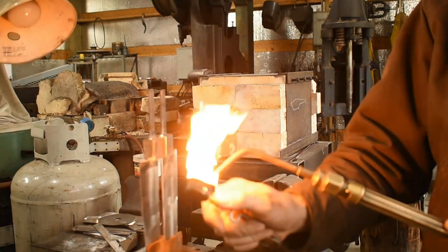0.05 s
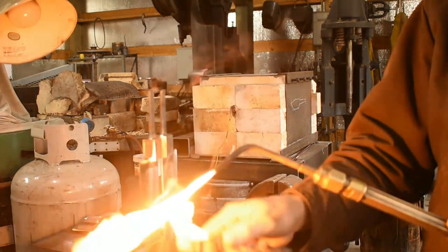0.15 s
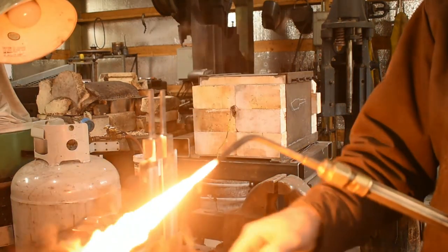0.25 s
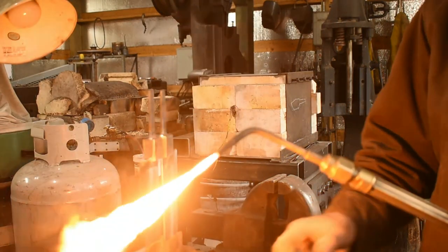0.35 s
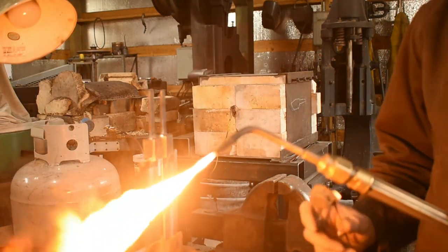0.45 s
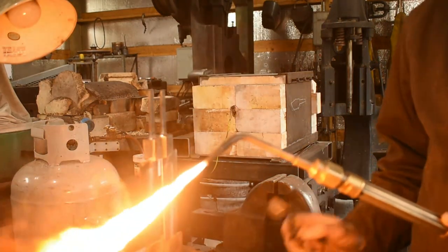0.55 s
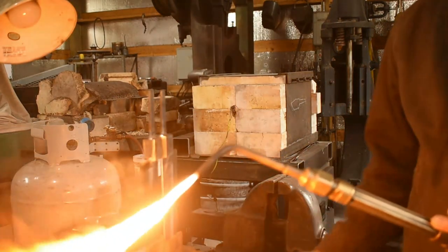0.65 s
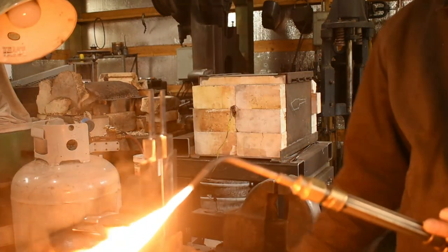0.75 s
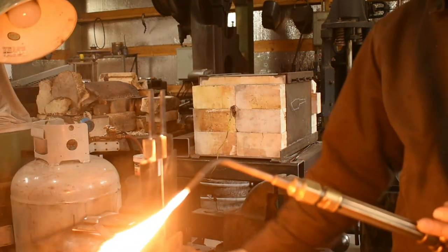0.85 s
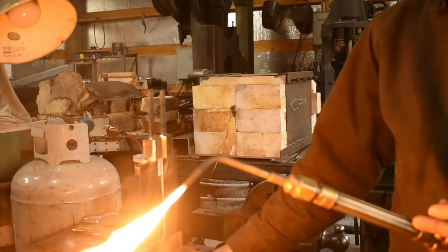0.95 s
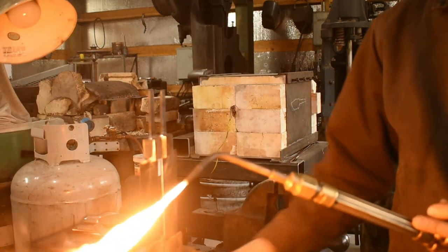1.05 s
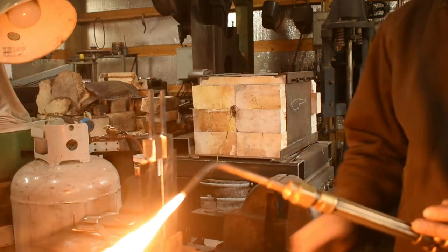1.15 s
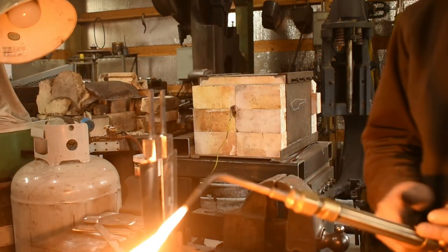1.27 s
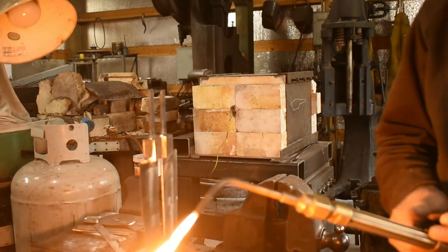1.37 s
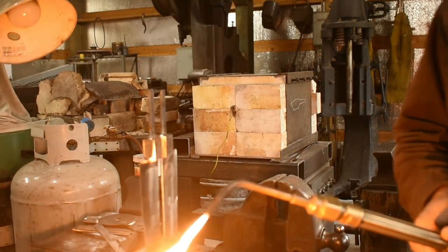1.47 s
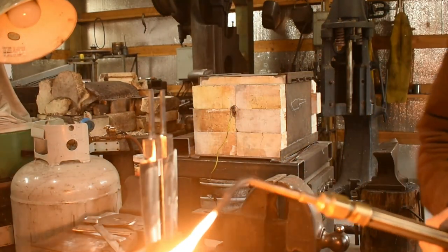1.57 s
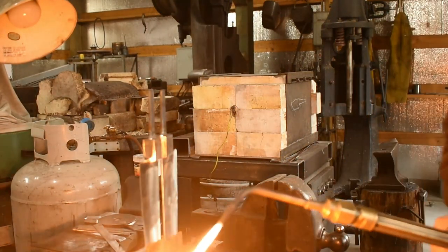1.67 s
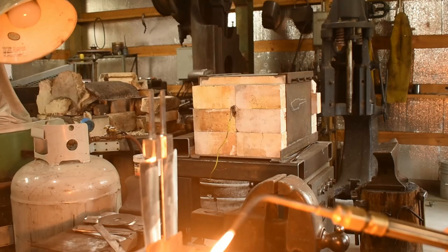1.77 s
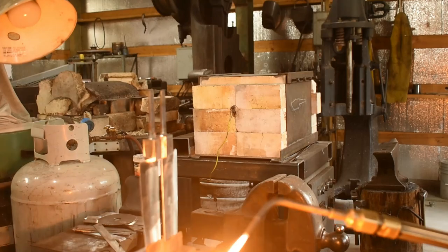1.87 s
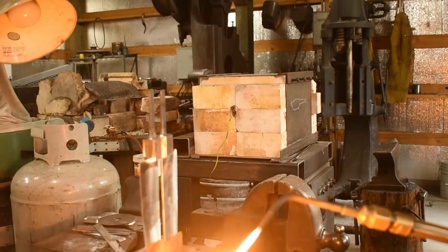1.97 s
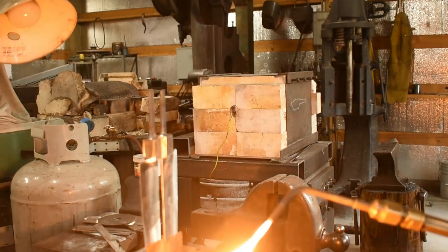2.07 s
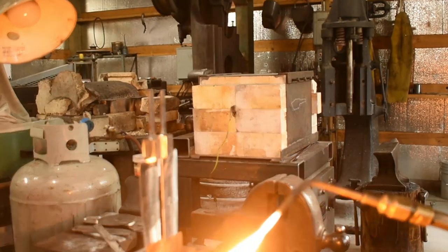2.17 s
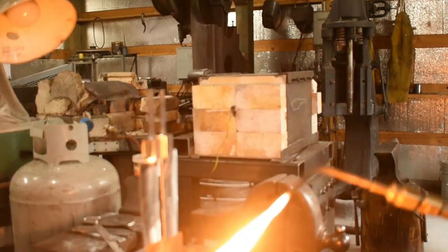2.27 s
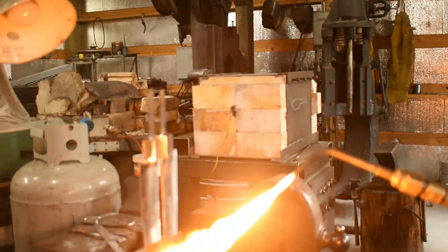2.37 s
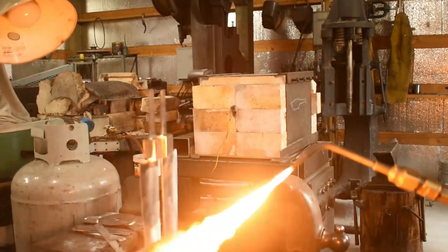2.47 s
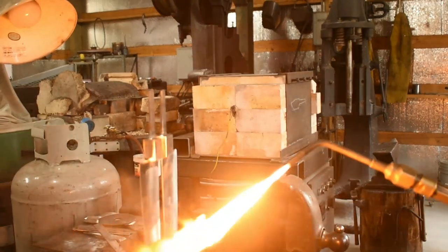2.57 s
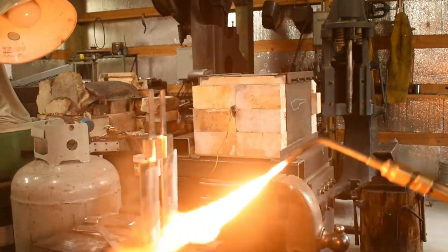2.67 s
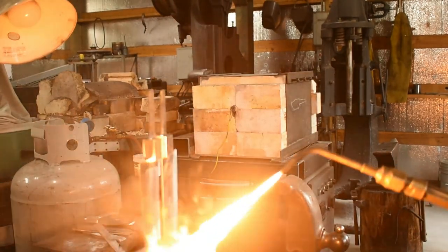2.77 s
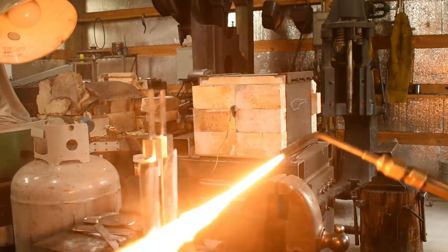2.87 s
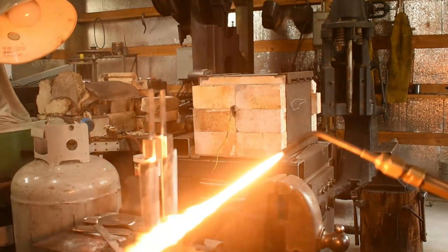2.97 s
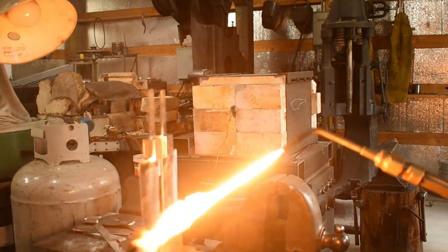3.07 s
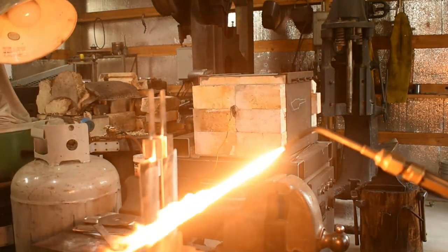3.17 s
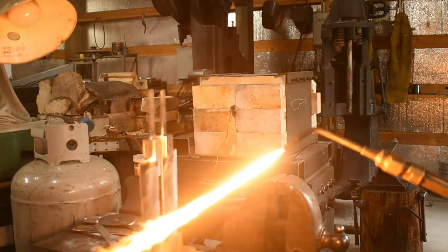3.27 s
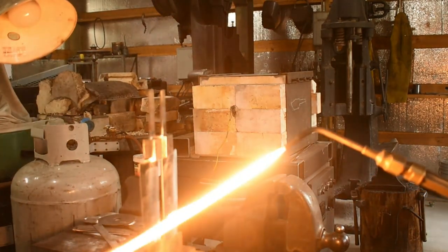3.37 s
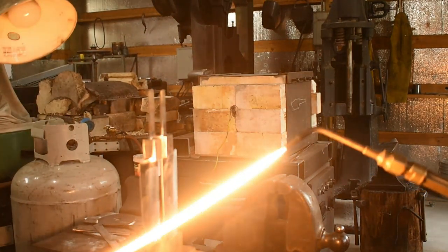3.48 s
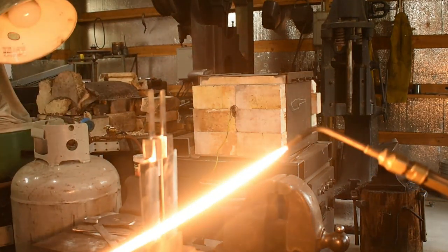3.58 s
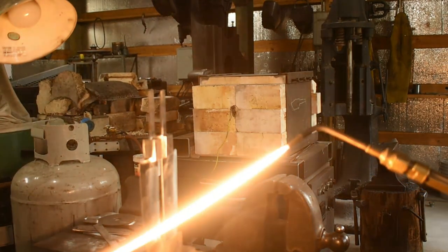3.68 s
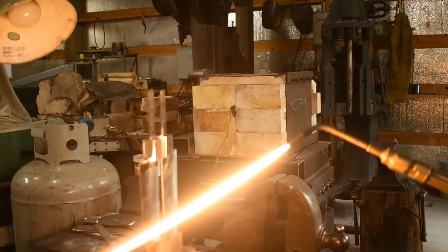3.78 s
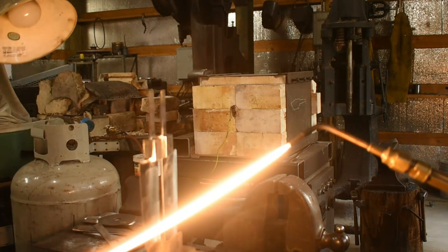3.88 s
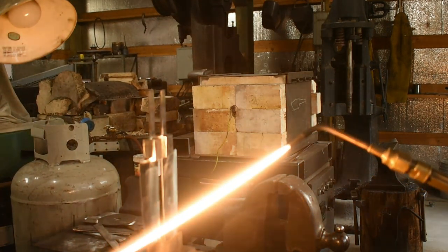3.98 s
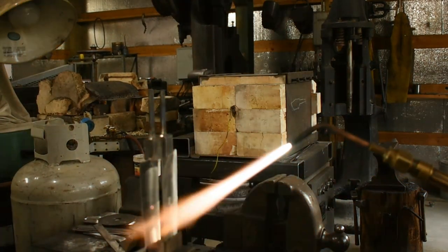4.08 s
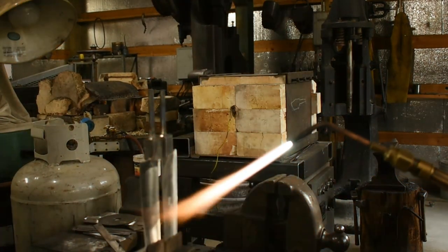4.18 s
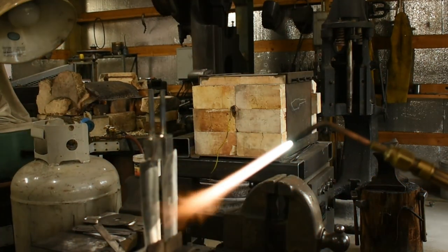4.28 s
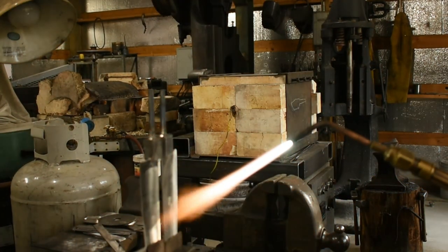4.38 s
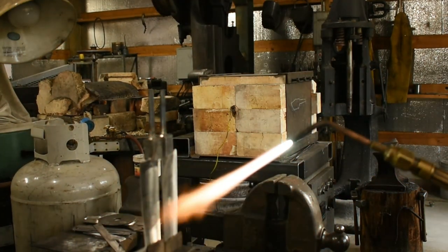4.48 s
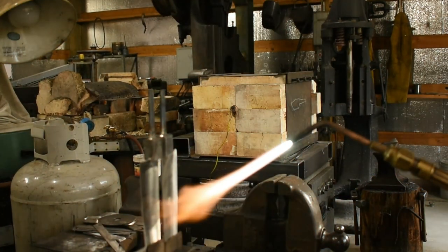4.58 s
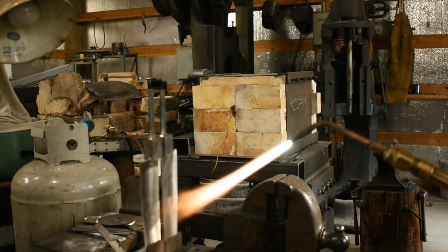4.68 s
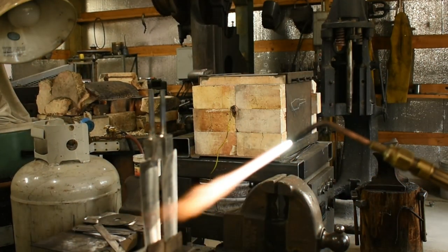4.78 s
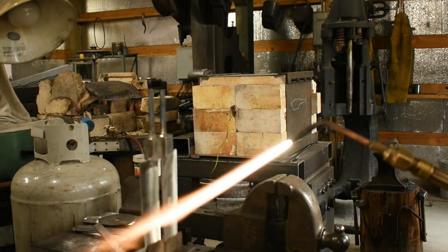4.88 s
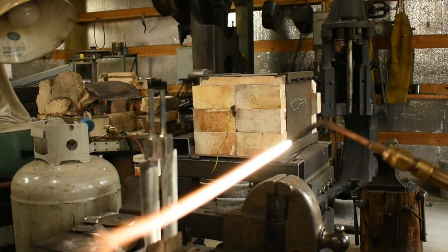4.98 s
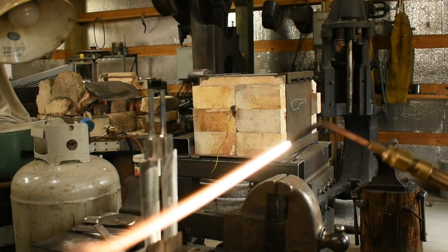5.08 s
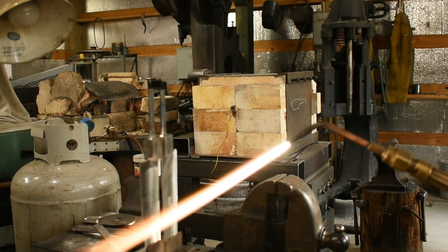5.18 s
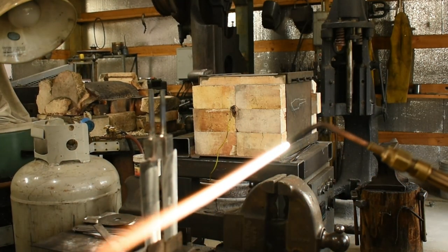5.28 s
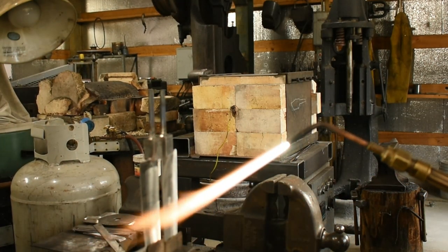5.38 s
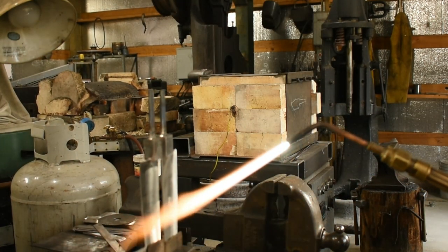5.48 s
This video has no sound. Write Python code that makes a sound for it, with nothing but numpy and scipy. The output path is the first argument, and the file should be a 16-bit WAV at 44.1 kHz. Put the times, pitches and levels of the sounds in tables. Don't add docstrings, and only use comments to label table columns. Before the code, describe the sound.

In a workshop, a flint striker rasps and gas ignites at once with a very loud, clipped pop. The striker's spring snaps back and a soft roaring flame settles in. About a second later the striker drops among steel tools, jingling and clattering, then bounces again. From three seconds the roar thins into dense dry spitting, joined by a hiss and a faint rising whistle, then fades. Close small microphone, thin bass, short room tail.

```python
import sys
import numpy as np
from scipy import signal
from scipy.fft import rfft, irfft, next_fast_len
from scipy.io import wavfile
from scipy.ndimage import uniform_filter1d, map_coordinates

SR = 44100
rng = np.random.default_rng(int(sys.argv[2]) if len(sys.argv) > 2 else 0)


def store_pcm(level_fs):
    pcm = np.round(np.clip(level_fs, -1, 1) * 32767).astype(np.int16)
    wavfile.write(sys.argv[1], SR, np.atleast_2d(pcm).T)


def undo_db(level):
    steps = np.asarray(level, float) / 20
    return 10 ** steps


N = 244446


def evened(x):
    return x / np.sqrt(np.mean(x ** 2) + 1e-20)


def read(points, hz):
    f, value = np.transpose(points)
    return np.interp(np.log(hz + 1), np.log(f + 1), value)


def follow(rows, silent_db=-140):
    s, *columns = np.transpose(rows)
    t = np.arange(N) / SR
    return [np.interp(t, s, column, silent_db, silent_db) for column in columns]


def spells(rows, fade_s=0.041):
    fade_db = 16.5
    power = 0
    for (start, start_db), (end, end_db) in rows:
        points = [(start - fade_s, start_db - fade_db), (start, start_db),
                  (end, end_db), (end + fade_s, end_db - fade_db)]
        power = power + undo_db(2 * follow(points)[0])
    return 10 * np.log10(power)


def coloured(x, points, unit=True):
    gain = read(points, np.fft.rfftfreq(8192, 1 / SR)) * np.log(10) / 20
    mirrored = np.r_[gain, gain[-2:0:-1]]
    taps = np.fft.ifft(np.exp(np.conj(signal.hilbert(mirrored)))).real[:4096]
    if unit:
        taps = taps / np.linalg.norm(taps)
    return signal.oaconvolve(x, taps)[:N]


def ringing(x, modes):
    t = np.arange(round(SR * max(mode[2] for mode in modes))) / SR
    body = sum(undo_db(db - 60 * t / t60) * np.sin(2 * np.pi * hz * t) for hz, db, t60 in modes)
    return signal.oaconvolve(x, body / np.linalg.norm(body))[:N]


def drift(size):
    once = uniform_filter1d(rng.standard_normal(N), size)
    return evened(uniform_filter1d(once, size))


def turbulence(points, flutter_db, gust_db):
    noise = coloured(rng.standard_normal(N), points)
    return evened(noise * undo_db(flutter_db * drift(size=150) + gust_db * drift(size=1800)))


def rattle(per_s, spread_db):
    knock = rng.random(N) < per_s / SR
    return evened(rng.standard_normal(N) * undo_db(spread_db * drift(size=25)) * knock)


def knocked(rows):
    out = np.zeros(N)
    for s, db in rows:
        out[round(s * SR)] = undo_db(db)
    return out


def struck(s, db, db_per_s, rise_s):
    late = np.arange(N) / SR - s
    return np.clip(1 + late / rise_s, 0, 1) ** 2 * undo_db(db - db_per_s * np.maximum(late, 0))


# (pitch [Hz], level [dB])
ROAR_COLOUR = [(25, -19.5), (130, -15.5), (190, -9.5), (265, -11), (330, -0.5), (430, -4.5), (520, 1.5),
               (600, -2), (670, 0.5), (870, -1), (1100, -3), (1600, -7), (2500, -28.5), (8000, -88)]
LEAN_ROAR_COLOUR = [(25, -36), (100, -14), (150, -6), (350, 3.5), (700, 2), (900, 0), (1200, -18),
                    (2000, -4.5), (8000, -72)]
# (pitch [Hz], level [dB])
JET_COLOUR = [(900, -26.5), (1500, -7), (2100, -4.5), (3200, -12.5), (4500, -15), (6000, -34.5),
              (8000, -43), (16000, -86)]
FIZZ_COLOUR = [(3500, -6.5), (5500, -4), (8000, -13.5), (11000, -18.5), (14000, -27), (16000, -46)]
SIZZLE_COLOUR = [(6000, 1), (9000, 6), (12000, -10), (14000, -6), (16000, -12)]
# (time [s], level [dB])
PLUME_SPELLS = [
    [(0, -66), (.05, -48)],
    [(.25, -37.5), (3.0, -38)],
    [(3.05, -37), (3.42, -42)],
    [(3.47, -61), (4.15, -86)],
    [(4.19, -51), (4.94, -50)],
    [(5.0, -62), (5.25, -74)],
    [(5.4, -59), (5.6, -61)],
]
# (time [s], level [dB])
TIP_SPELLS = [
    [(0, -61), (.05, -65)],
    [(.25, -43.5), (3.2, -42.5)],
    [(3.24, -40.5), (4.1, -49.5)],
    [(4.14, -55), (5.6, -67)],
]
# (time [s], level [dB])
STREAM_SPELLS = [
    [(0, -62), (.05, -67)],
    [(.25, -51), (3.15, -53.5)],
    [(3.2, -71), (4.1, -80)],
    [(4.15, -60), (4.22, -54)],
    [(4.27, -43), (4.56, -45.5)],
    [(4.6, -44), (4.94, -61)],
    [(4.98, -72), (5.6, -83)],
]
# (time [s], flame swell [dB], nozzle turned to the microphone [dB])
HAND_SWAY = [(.3, -3.5, -5.5), (.55, 2, -0.5), (.63, -0.5, -4), (.88, 3.5, 0), (1, 4, 3.5),
             (1.09, 3.5, 0.5), (1.56, 0.5, -1), (1.69, 2.5, 3), (1.97, 4.5, -1.5), (2.2, 2.5, -0.5),
             (2.33, 0, -2), (2.45, 0, 1), (2.72, 0, -0.5), (2.9, 6, 2.5), (3.02, 3, 4), (3.12, 0, 7),
             (3.2, 3.5, -2)]
# (time [s], level [dB], half width [s])
PLUME_FLAPS = [
    (2.819, 4.5, 0.035),
    (4.2, 7, 0.039),
    (4.36, 10.5, 0.019),
    (4.54, 6.5, 0.065),
    (4.92, 8.5, 0.022),
]


def flame():
    t = np.arange(N) / SR
    swell, aim = follow(HAND_SWAY, 0)
    flap = sum(db * np.exp(-((t - s) / width) ** 2) for s, db, width in PLUME_FLAPS)
    lean = t > 3.46
    rich_flap = flap * ~lean

    rich_roar = turbulence(ROAR_COLOUR, 0.57, 1.0)
    lean_roar = turbulence(LEAN_ROAR_COLOUR, 0.38, 1.5)
    roar = undo_db(spells(PLUME_SPELLS) + 0.27 * swell + flap) * np.where(lean, lean_roar, rich_roar)
    jet = undo_db(spells(TIP_SPELLS) + swell + 1.54 * rich_flap) * turbulence(JET_COLOUR, 2.7, 0.29)
    fizz_db = spells(STREAM_SPELLS) + aim + 2.0 * rich_flap
    fizz = undo_db(fizz_db) * turbulence(FIZZ_COLOUR, 1.0, 0.4)
    sizzle_db = fizz_db - 11.0 + 0.35 * (fizz_db + 48.5)
    seep_db = -83
    sizzle = np.hypot(undo_db(sizzle_db), undo_db(seep_db)) * turbulence(SIZZLE_COLOUR, 2.5, 0.86)
    return roar + jet + fizz + sizzle


# (time [s], delay [ms])
BENCH_DELAY = [(.3, 1.66), (.5, 1.89), (.9, 1.815), (1.1, 1.885), (1.3, 1.885), (1.7, 1.985), (2, 1.93),
               (2.4, 1.965), (2.7, 1.89), (3.1, 1.745), (3.3, 1.74), (3.7, 1.79), (4.4, 1.775), (4.9, 1.83),
               (5.3, 1.815)]
# (time [s], level [dB])
BENCH_LEVEL = [
    (0, -2.5),
    (1.6, -.5),
    (3.1, -.5),
    (3.3, -5),
    (5.54, -5),
]
# (pitch [Hz], level [dB])
BENCH_SHINE = [(300, -16), (900, -10), (1500, -3.5), (5000, -3), (8000, -9), (16000, -16)]


def bench(x, turn):
    delay = np.interp(np.arange(N) / SR, *np.transpose(BENCH_DELAY)) * SR / 1000
    size = next_fast_len(N)
    shine = undo_db(read(BENCH_SHINE, np.fft.rfftfreq(size, 1 / SR)))
    turned = irfft(rfft(x, size) * shine * np.exp(1j * turn), size)
    echo = map_coordinates(turned, [np.arange(N) - delay], order=3, mode="constant")
    return x + undo_db(follow(BENCH_LEVEL)[0]) * echo


# (pitch [Hz], time to fall 60 dB [s])
ROOM_DECAY = [(150, 0.65), (600, 0.47), (2000, 0.37), (6000, 0.13), (14000, 0.19)]


def room(x):
    taps = np.zeros(SR // 2)
    at = np.arange(240, SR // 2 - 20, 20)
    taps[at + rng.integers(0, 20, len(at))] = rng.choice([-1., 1.], len(at))
    hz, t, z = signal.stft(taps, SR, nperseg=256)
    decay = undo_db(-60 * t / read(ROOM_DECAY, hz)[:, None])
    tail = signal.istft(z * decay, SR, nperseg=256)[1]
    return signal.fftconvolve(x, tail / np.linalg.norm(tail))[:N]


# (start [s], hardest [s], end [s], level [dB], rise [dB])
FLINT_SCRAPES = [
    (.0295, .03, .034, -49, 8),
    (.0575, .061, .072, -17, 11),
    (.12, .122, .124, -47, 8),
    (.1655, .166, .1665, -42, 8),
    (.184, .2095, .213, -23, 14),
]
# (pitch [Hz], level [dB])
FLINT_COLOUR = [(1000, -23), (2200, -8), (3000, -4), (4300, 7.5), (6000, -15), (7300, -3.5), (11000, -15),
                (16000, -26)]
RETURN_COLOUR = [(500, -9), (1500, -2.5), (3000, 3), (4900, 2.5), (6200, -7), (10500, -6.5), (14000, -6),
                 (16000, -26)]
# (time [s], level [dB])
WIRE_JOLTS = [
    (.001, -36),
    (.031, -32),
    (.063, -30),
    (.1665, -17),
    (.2055, -10),
]
# (pitch [Hz], level [dB], time to fall 60 dB [s])
WIRE_RING = [(4800, -4, .04), (7228, 1, .26), (7272, 2.5, .26), (14000, -14, .04)]
WIRE_SQUEAK = [(7228, -2, .06), (7290, 0, .05), (4850, -9, .05)]


def flint_scrapes():
    grit = rattle(12000, 0.33)
    strokes = []
    for start, hardest, end, db, rise_db in FLINT_SCRAPES:
        points = [(start, db - rise_db), (hardest, db), (end, db - 6.5), (end + 0.0037, db - 39)]
        strokes.append(grit * undo_db(follow(points)[0]))
    scrape = coloured(sum(strokes[:-1]), FLINT_COLOUR)
    spring_back = undo_db(-1.5) * coloured(strokes[-1], RETURN_COLOUR)
    wire = ringing(knocked(WIRE_JOLTS), WIRE_RING)
    squeak = ringing(0.095 * strokes[1] + strokes[-1], WIRE_SQUEAK)
    return scrape + spring_back + wire + squeak


# (time [s], signed pressure, length [ms])
POP_BLASTS = [
    (0.067, -0.65, 0.31),
    (.0672, -1.55, 0.17),
    (0.0678, 1.44, 0.2),
    (0.0702, -0.67, 0.3),
    (0.0711, 0.8, 0.1),
]
# (pitch [Hz], level [dB], time to fall 60 dB [s])
BOOM_RING = [(180, -6, 0.065), (489, -15, 0.062), (935, 0, 0.08), (1300, 31, 0.03), (2030, 26, 0.06),
             (1990, 9, 0.11), (2076, 46, 0.026), (4120, 28, 0.012)]
# (pitch [Hz], level [dB])
FIREBALL_COLOUR = [(60, -26), (130, 0), (190, 3), (290, 6), (390, -4), (480, 1.5), (700, -12), (900, -1),
                   (1400, -7.5), (2200, -1.5), (3000, -8.5), (5000, -23), (9000, -41)]
# (pitch [Hz], level [dB], time to fall 60 dB [s])
HOLLOW_RING = [(165, -9, .3), (225, 2, .16), (283, 8, .11), (470, -5, .2), (515, -4, .12), (651, 0, .07),
               (906, -2, .14), (982, -8, .18), (1983, -2, .22), (2030, -4, .18), (2079, 2, .07),
               (2129, -7, .28), (2247, -8, .35)]
# (time [s], level [dB])
WALL_SLAPS = [
    (.0895, -10),
    (.0975, -13),
    (0.1131, -22),
    (.127, -18),
    (.149, -16.5),
]
# (pitch [Hz], level [dB], time to fall 60 dB [s])
SLAP_RING = [(890, -4, 0.011), (2100, 3, 0.017), (2400, 7, 0.013), (514, -11, .02)]
# (pitch [Hz], level [dB])
THUMP_LIMIT = [(90, -22), (135, 0)]


def pop():
    t = np.arange(N) / SR
    catch_s = .0684
    push = np.zeros(N)
    for s, pressure, ms in POP_BLASTS:
        u = np.clip((t - s) * 1000 / ms, 0, 40)
        push += 0.5 * pressure * np.e * u * (1 - u / 2) * np.exp(-u)
    boom = undo_db(1.5) * ringing(push, BOOM_RING)

    hum = ringing(knocked([(catch_s, 8)]), HOLLOW_RING)
    blurred = uniform_filter1d(uniform_filter1d(knocked(WALL_SLAPS), size=5), size=5)
    slaps = undo_db(12.5) * ringing(blurred, SLAP_RING)

    burst = struck(catch_s, -0.5, 2200, 0.00094)
    settling = struck(catch_s, -21, 155, 0.0011)
    rush = (burst + settling) * coloured(rng.standard_normal(N), FIREBALL_COLOUR)
    return coloured(push + boom + hum + slaps + rush, THUMP_LIMIT, unit=False)


# (time [s], rattle of the tools [dB], jingle of the striker [dB])
DROP_BOUNCES = [(1.103, -57, -36), (1.108, -30, -21), (1.1118, -18, -35), (1.119, -22, -47),
                (1.132, -34, -49), (1.141, -32, -46), (1.152, -28, -50), (1.164, -35, -54),
                (1.209, -35, -57), (1.37, -25, -30), (1.375, -30, -44), (1.385, -47, -48),
                (1.398, -50, -45), (1.419, -46, -62), (1.443, -40, -67)]


def bounced(column, db_per_s, rise_s):
    total = 0
    for row in DROP_BOUNCES:
        s, db = row[0], row[column]
        total = total + struck(s, db, db_per_s, rise_s) + struck(s, db - 17.5, 121, rise_s)
    return total


# (pitch [Hz], level [dB])
CLATTER_COLOUR = [(200, -29.5), (380, -13.5), (600, -14), (1100, -8.5), (2100, -4), (2800, -7), (4400, -1),
                  (6000, -6), (9000, -13.5), (16000, -42)]
JINGLE_COLOUR = [(3000, -12.5), (5500, 5.5), (8000, 8.5), (11000, 4), (14000, -2), (16000, -22)]
# (pitch [Hz], level [dB], time to fall 60 dB [s])
TOOL_RING = [(2762, -4, .07), (3830, -2, .06), (4366, 2, .06), (5425, -4, .08)]
STEEL_RING = [(5410, -1, .08), (6473, -1, .2), (6610, -3, .12), (6700, 1, .2), (7760, -5, .12),
              (8400, -3, .15), (8470, -5, .3), (9124, -2, .12), (10125, -5, .13), (11000, -6, .17),
              (11400, -3, .16), (12550, -11, .12), (12800, -8, .26), (13900, -13, .12)]
# (time [s], level [dB])
STEEL_CRACKS = [
    (1.1128, -1.5),
    (1.1205, -2.5),
    (1.1235, -7),
    (1.132, -11),
    (1.1632, -17),
    (1.3715, -9),
]
# (time [s], level [dB])
SPANNER_KNOCKS = [
    (1.151, -1),
    (1.16, 0),
    (1.1622, -3),
    (1.176, -8),
    (1.204, -8),
    (1.218, -14),
    (1.235, -12),
    (1.276, -17),
]
# (pitch [Hz], level [dB], time to fall 60 dB [s])
SPANNER_RING = [(2758, 0, .07), (2811, -7, .06)]
# (time [s], level [dB])
SKID_LEVEL = [
    (1.385, -35),
    (1.41, -33.5),
    (1.43, -27),
    (1.455, -41),
    (1.49, -47),
]
# (pitch [Hz], level [dB])
SKID_COLOUR = [(400, -17.5), (1100, 1), (1800, -11), (2800, -3.5), (4200, -10), (7000, -33)]


def dropped_striker():
    knocks = rattle(28000, 0.34)
    heavy = knocks * bounced(1, 466, 0.0083)
    light = knocks * bounced(2, 700, 0.0033) + 1.5 * knocked(STEEL_CRACKS)
    tools = coloured(heavy, CLATTER_COLOUR) + undo_db(-10) * ringing(heavy, TOOL_RING)
    spanner = ringing(knocked(SPANNER_KNOCKS), SPANNER_RING)
    skid = coloured(knocks * undo_db(follow(SKID_LEVEL)[0]), SKID_COLOUR)
    jingle = coloured(light, JINGLE_COLOUR)
    cup = undo_db(-8 + 3.5 * drift(size=250)) * ringing(light + .25 * heavy, STEEL_RING)
    return tools + spanner + skid + jingle + cup


# (pitch [Hz], level [dB])
BODY_COLOUR = [(800, -55.5), (1500, 2), (2100, 10), (3500, 8.5), (5000, 4.5), (6500, -6), (9000, -15),
               (16000, -35)]
EDGE_COLOUR = [(4000, 3.5), (6500, 7), (10000, -1.5), (13000, -6.5), (16000, -30)]
# (time [s], body level [dB], treble level [dB])
LOUD_RICH = [(3.1955, -26, -44), (3.2557, -19, -50), (3.276, -17, -51), (3.314, -20, -59),
             (3.335, -24, -49), (3.357, -24, -52), (3.42, -41, -43), (3.434, -21.5, -53),
             (3.4776, -19.5, -47), (3.484, -23, -41), (3.514, -19.5, -49), (3.534, -22, -42),
             (3.5482, -17.5, -48), (3.615, -21, -43), (3.6422, -19, -45), (3.669, -20.5, -57),
             (3.679, -21, -51), (3.745, -25, -46), (3.769, -23.5, -49), (3.7896, -22.5, -43),
             (3.822, -18.5, -54), (3.875, -18.5, -40), (3.8838, -23, -55), (3.9292, -18, -39),
             (3.971, -20, -30), (3.9885, -17, -25.5), (4.0116, -23, -55), (4.0287, -20, -53),
             (4.042, -20, -45), (4.0718, -17, -42)]
LOUD_LEAN = [(4.0977, -30, -41), (4.14, -50, -32), (4.15, -31, -37), (4.159, -51, -34), (4.169, -33, -28.5),
             (4.175, -32, -37), (4.187, -33, -30), (4.2342, -42, -32), (4.2555, -40, -31),
             (4.526, -46, -23), (4.618, -32, -31), (4.663, -29, -31), (4.7093, -36, -30),
             (4.8023, -29, -36), (4.872, -28, -34), (4.913, -49, -42), (4.9402, -28, -34),
             (4.953, -26, -32), (4.982, -42, -42), (4.996, -26.5, -41), (5.0478, -27, -33),
             (5.078, -30, -46), (5.155, -30, -35), (5.1878, -28, -44), (5.204, -28, -31), (5.214, -25, -33),
             (5.239, -33, -39), (5.289, -29, -39), (5.334, -37, -43), (5.453, -30, -41)]
# (time [s], body level [dB], treble level [dB])
MIDDLING_RICH = [(3.1515, -47, -61), (3.156, -44, -59), (3.178, -36, -63), (3.184, -32, -64),
                 (3.189, -42, -65), (3.201, -36, -68), (3.2212, -37, -69), (3.2386, -46, -72),
                 (3.2836, -29, -67), (3.294, -42, -67), (3.32, -37, -70), (3.326, -28, -66),
                 (3.346, -28, -61), (3.369, -28, -69), (3.4077, -32, -74), (3.454, -33, -67),
                 (3.4556, -42, -71), (3.467, -44, -63), (3.491, -35, -57), (3.5023, -35, -67),
                 (3.587, -35, -77), (3.592, -27, -68), (3.607, -30, -68), (3.6316, -33, -63),
                 (3.637, -32, -64), (3.653, -40, -55), (3.688, -35, -50), (3.6995, -30, -58),
                 (3.7129, -30, -63), (3.716, -38, -67), (3.7277, -37, -67), (3.7332, -29, -70),
                 (3.739, -33, -65), (3.7765, -28, -48), (3.801, -36, -70), (3.809, -33, -69),
                 (3.8278, -29.5, -61), (3.8345, -37, -65), (3.8643, -46, -68), (3.889, -29, -67),
                 (3.9146, -30, -65), (3.9485, -32, -67), (3.9526, -38, -60), (3.957, -43, -64),
                 (3.967, -33, -50), (4.0043, -27.5, -53), (4.0566, -30, -61), (4.0607, -28, -61),
                 (4.0813, -32, -58), (4.1068, -31, -59)]
MIDDLING_LEAN = [(4.1229, -39, -52), (4.1344, -36, -49), (4.181, -39, -47), (4.2113, -40, -49),
                 (4.217, -42, -55), (4.2482, -37, -39), (4.265, -35, -52), (4.272, -32, -46),
                 (4.2975, -40, -42), (4.3185, -35, -38), (4.369, -42, -44), (4.3883, -43, -45),
                 (4.3974, -38, -38), (4.4287, -38, -39), (4.4594, -41, -54), (4.4643, -39, -42),
                 (4.4736, -40, -51), (4.5302, -42, -44), (4.571, -43, -39), (4.577, -38, -56),
                 (4.594, -35, -53), (4.6037, -32, -41), (4.6452, -37, -42), (4.674, -35, -46),
                 (4.6969, -41, -50), (4.718, -34, -46), (4.7284, -40, -59), (4.7408, -37, -59),
                 (4.747, -31.5, -60), (4.7536, -38, -54), (4.76, -50, -56), (4.778, -41, -49),
                 (4.7897, -37, -42), (4.8218, -38, -47), (4.834, -35, -47), (4.8502, -39, -56),
                 (4.8573, -41, -54), (4.878, -38, -62), (4.8952, -44, -60), (4.905, -41, -45),
                 (4.932, -44, -62), (4.9617, -36, -58), (4.966, -39, -45), (5.015, -39, -64),
                 (5.032, -36, -55), (5.0556, -35, -60), (5.1071, -45, -65), (5.1248, -37, -61),
                 (5.1376, -48, -66), (5.1757, -41, -51), (5.2444, -39, -47), (5.2952, -38.5, -56),
                 (5.3405, -41, -66), (5.358, -38.5, -68), (5.3666, -47, -49), (5.4376, -46, -62)]
# (time [s], level [dB])
CHANCE_SPELLS = [
    [(3.2, -59), (4.1, -52)],
    [(4.13, -45), (4.3, -37)],
    [(4.34, -36.5), (5.08, -53)],
    [(5.12, -50), (5.46, -64)],
]
# (time [s], level [dB])
PATTER_SPELLS = [
    [(3.25, -59), (4.1, -45.5)],
    [(4.15, -59), (4.24, -56)],
    [(4.29, -50.5), (4.8, -47.5)],
    [(4.84, -57.5), (5.6, -63.5)],
]
# (time [s], level [dB])
SHARPNESS = [
    [(3.2, -32), (4.08, -27)],
    [(4.13, 2.5), (4.7, -1.5)],
    [(4.75, 0), (5.6, -10)],
]


def spits():
    body, treble = np.zeros(N + 300), np.zeros(N + 300)
    t_ms = np.arange(300) / SR * 1000
    sharp_db = spells(SHARPNESS)

    wait, size, edge = rng.random((400, 3)).T
    at = (3.15 + np.cumsum(.004 - np.log(wait) / 130)) * SR
    at = np.minimum(at, N - 1).astype(int)
    chance_db = spells(CHANCE_SPELLS)[at] + 8 * (size - .5)
    chance = zip(at / SR, chance_db, sharp_db[at] + 10.0 * (edge - .5))

    rows = [(s, db - 2.5, treble_db - db + 1.0) for s, db, treble_db in LOUD_RICH + LOUD_LEAN]
    rows += [(s, db + 3.5, treble_db - db + 2.5) for s, db, treble_db in MIDDLING_RICH + MIDDLING_LEAN]
    rows += [row for row in chance if row[0] < 5.5]
    for (s, body_db, share_db), grit in zip(rows, rng.standard_normal((500, 301))):
        ms = .85 * np.exp(0.4 * grit[-1])
        puff = grit[:-1] * abs(grit[:-1]) * (t_ms / ms + 0.27) * np.exp(-t_ms / ms)
        puff *= np.sqrt(SR / 1000) / np.linalg.norm(puff)
        start = round(s * SR)
        body[start:start + 300] += puff * undo_db(body_db - 4.5)
        treble[start:start + 300] += puff * undo_db(body_db + share_db + 5.5) * np.exp(-t_ms / 0.86)

    tiny = undo_db(1.3 * np.minimum(rng.exponential(1, N), 3)) * (rng.random(N) < 300 / SR)
    clumps = signal.oaconvolve(tiny, np.exp(-t_ms / 0.48))[:N] * rng.standard_normal(N)
    patter = undo_db(spells(PATTER_SPELLS)) * evened(clumps)
    sharp_patter = undo_db(1.1 * sharp_db - 3) * patter
    return coloured(body[:N] + patter, BODY_COLOUR), coloured(treble[:N] + sharp_patter, EDGE_COLOUR)


# (time [s], pitch [Hz])
WHISTLE_PITCH = [(4.262, 4950), (4.287, 5700), (4.335, 6350), (4.39, 6950), (4.5, 7250), (4.595, 7380),
                 (4.665, 8130), (4.765, 8850), (4.87, 8680)]
# (time [s], level [dB])
WHISTLE_LEVEL = [
    [(4.285, -44.5), (4.86, -56)],
]


def whistle():
    hz = np.interp(np.arange(N) / SR, *np.transpose(WHISTLE_PITCH))
    db = spells(WHISTLE_LEVEL, 0.049)
    waver = 1 + .016 * drift(size=40) + .007 * drift(size=300)
    turns = np.cumsum(hz * waver) / SR
    octave = undo_db(-15 - np.maximum(hz - 7400, 0) / 15)
    tone = np.sin(2 * np.pi * turns) + octave * np.sin(4 * np.pi * turns)
    return np.sqrt(2) * undo_db(db + .5 + 3 * drift(size=200)) * tone


def scene():
    fire = flame()
    metal = flint_scrapes() + dropped_striker()
    blast = pop()
    body, edge = spits()
    burning = undo_db(-1.5) * (bench(fire + body + whistle(), 1.5) + edge)
    wet = room(undo_db(-8.5) * burning + undo_db(-9.5) * metal + undo_db(-19.5) * blast)
    return (burning + metal + blast + wet)[None]


def top_cut(x):
    return signal.sosfilt(signal.butter(12, 16810, fs=SR, output="sos"), x)


# (pitch [Hz], level [dB])
MIC_COLOUR = [(25, -27), (70, -17.5), (105, -12.5), (135, -3.5), (180, 0.5), (15000, -1.5),
              (15700, 0), (15950, -50)]
# (pitch [Hz], level [dB])
IDLE_COLOUR = [(25, -34), (100, -23), (200, -26.5), (400, -6), (700, -3), (1300, -8.5), (2500, -17),
               (7000, -33.5), (12000, -42), (15700, -58), (16100, -84)]


def record(dry):
    overloaded = np.clip(dry[0], -.87, .87)
    thin = coloured(overloaded, MIC_COLOUR, unit=False)
    idle = undo_db(-52.5) * coloured(rng.standard_normal(N), IDLE_COLOUR)
    return top_cut((thin + idle)[None])


dry = scene()
out = record(dry)
store_pcm(out)
```